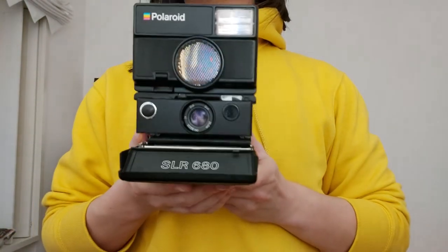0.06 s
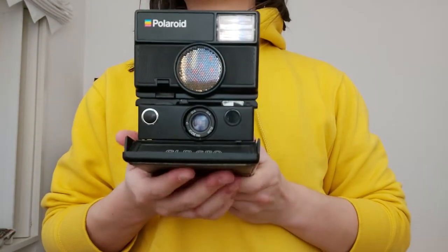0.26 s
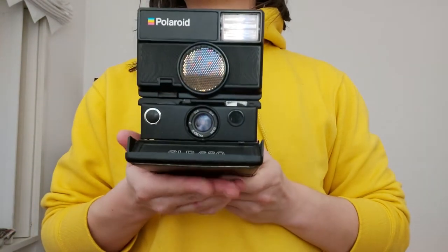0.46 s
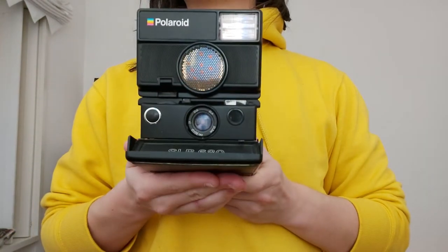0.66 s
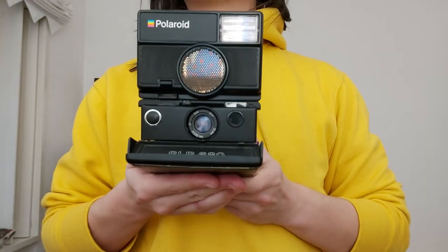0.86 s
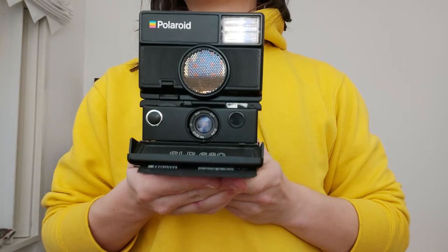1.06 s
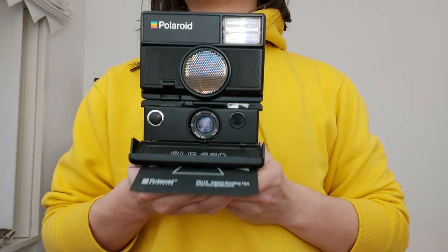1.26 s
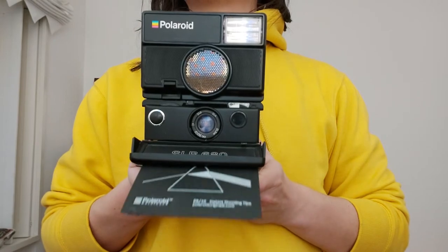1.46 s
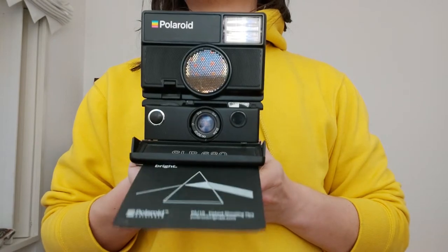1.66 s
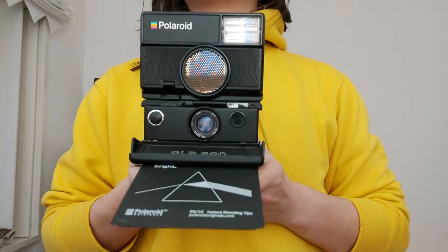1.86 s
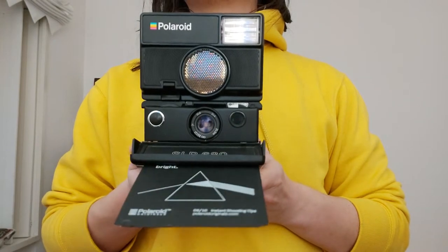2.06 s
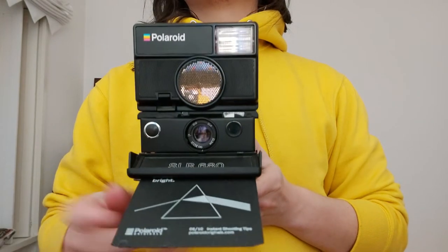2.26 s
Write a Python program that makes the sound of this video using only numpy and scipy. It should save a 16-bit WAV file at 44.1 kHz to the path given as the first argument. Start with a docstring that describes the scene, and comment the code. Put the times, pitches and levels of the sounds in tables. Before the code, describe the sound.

Close up in a quiet room, an instant camera's shutter clacks several times and its motor whines, straining as rollers squeeze out the picture. The whir rises in pitch near the end and cuts off with a sharp click.

```python
"""A shutter button slides in, then an instant camera clacks and whirrs as it ejects a picture.
Latches and the mirror strike the hollow body, and a small motor drives rattling plastic gears.
The motor labours while the rollers squeeze the sheet, runs free once it is out, and stops with a
sharp click; springs ring on. The camera is close to a stereo microphone in a small, quiet room."""
import sys
import numpy as np
from scipy import signal
from scipy.fft import rfft, irfft, next_fast_len
from scipy.io import wavfile

SR = 44100
rng = np.random.default_rng(int(sys.argv[2]) if len(sys.argv) > 2 else 0)


def digitize_waveform(pressure):
    """Quantize a signal to 16-bit integers and store it at the path in sys.argv[1].

    Rows of a 2-D input are taken as channels; values are limited to [-1, 1].
    """
    field = np.atleast_2d(pressure).T
    bounded = np.clip(field, -1, 1)
    quanta = np.round(bounded * 32767).astype(np.int16)
    wavfile.write(sys.argv[1], SR, quanta)


N = 101429
TIME = np.arange(N) / SR


def amp(db):
    """Turns decibels into a number to multiply by."""
    return 10 ** (np.asarray(db) / 20)


def unit(x):
    """Scales a sound to an average (rms) size of 1."""
    return x / np.sqrt(np.mean(x ** 2) + 1e-20)


def curve(rows, column=1):
    """Joins the points of a time table with straight lines."""
    rows = np.array(rows)
    return np.interp(TIME, rows[:, 0], rows[:, column])


def look_up(points, hz):
    """Reads between the rows of a frequency table, with octaves evenly spaced."""
    f, value = np.transpose(points)
    return np.interp(np.log(hz + 1), np.log(f + 1), value)


def colour(x, points, lag_s=0):
    """Turns each frequency up or down by a table, with no ringing ahead of the sound."""
    size = 2 * next_fast_len(N)
    hz = np.fft.fftfreq(size, 1 / SR)
    log_gain = np.log(amp(look_up(points, abs(hz))))
    response = np.exp(np.conj(signal.hilbert(log_gain)) - 2j * np.pi * hz * lag_s)
    return irfft(rfft(x, size) * response[:size // 2 + 1], size)[..., :N]


def drift(rate_hz):
    """A random wander of size 1, mostly slower than the given rate."""
    hz = np.fft.rfftfreq(N, 1 / SR)
    return unit(irfft(rfft(rng.standard_normal(N)) / (1 + (hz / rate_hz) ** 2), N))


def add(mix, start_s, sound):
    """Mixes a sound into both channels at a given time."""
    part = mix[:, round(start_s * SR):][:, :sound.shape[-1]]
    part += sound[..., :part.shape[1]]


# how much of a sound differs between left and right: f/Hz, share/dB
STEREO_SPREAD = [(40, -5), (150, -8), (350, -25.5), (700, -3), (1500, -1.5), (3000, -4), (16000, -4)]

def stereo(a, b):
    """Makes two channels that share sound a and differ by sound b."""
    n = len(a)
    share = np.clip(amp(look_up(STEREO_SPREAD, np.fft.rfftfreq(n, 1 / SR))), 0, 1)
    same = irfft(rfft(a) * np.sqrt(1 - share ** 2), n)
    apart = irfft(rfft(b) * share, n)
    return np.array([same + apart, same - apart])


def hiss(n=N):
    """Noise that is partly alike on the left and right."""
    return stereo(*rng.standard_normal((2, n)))


def rubbing(scrape, levels, band_hz):
    """Friction: one band of a scraping noise swells and fades by a table."""
    band = signal.butter(3, band_hz, "band", fs=SR, output="sos")
    sounding = (TIME > levels[0][0]) & (TIME < levels[-1][0])
    return sounding * amp(curve(levels)) * unit(signal.sosfilt(band, scrape))


# the tone of the quiet room: f/Hz, relative level/dB
ROOM_TONE = [(20, -19), (50, 0.5), (90, -9), (200, -10.5), (500, -11.5), (900, -15), (2000, -19.5),
             (4200, -27), (5200, -29), (8000, -35.5), (11000, -26), (16000, -24.5)]

def room_tone(level_db=-75):
    """A very faint rush lies under everything."""
    return amp(level_db) * unit(colour(hiss(), ROOM_TONE))


# the button's slide: t/s, level/dB
BUTTON_SLIDE = [(.15, -100), (.19, -72), (.205, -76), (.214, -51), (.232, -47), (.25, -100)]

def shutter_button():
    """The button rubs as it slides in."""
    return rubbing(hiss(), BUTTON_SLIDE, band_hz=(600, 3000))


def blow(low_hz, high_hz, buzz_fade_s, scatter_db, scatter_fade_s, buzz_db=-2):
    """A struck part: a sharp push, a brief contact buzz, then shaking that scatters through the case."""
    t = TIME[:SR // 5]
    band = signal.butter(2 if low_hz < 1200 else 3, [low_hz, high_hz], "band", fs=SR, output="sos")
    push = signal.sosfilt(band, 1. * (t == 0))
    buzz = signal.sosfilt(band, rng.standard_normal(len(t)) * amp(-60 * t / buzz_fade_s))
    scatter = signal.sosfilt(band, hiss(len(t)) * amp(-60 * t / scatter_fade_s))
    contact = unit(unit(push) + amp(buzz_db) * unit(buzz))
    return unit(contact + amp(scatter_db) * unit(scatter)) / np.sqrt(20)  # energy of 10 ms at size 1


# the parts that ring: hollow body, mirror, shell, latch, pawl (a gear's catch), metal edge
# low f/Hz, high f/Hz, buzz fade/s, scatter level/dB, scatter fade/s (a fade is a 60 dB drop)
PARTS = [(343.5, 637, 0.014, 0.5, 0.19), (795, 1018, 0.0037, 3.5, 0.058), (1518, 2165, 0.0018, -2.5, 0.067),
         (1900, 4500, 0.018, 3, 0.088), (4960, 5646, 0.0057, -11.5, 0.036),
         (10730, 15500, 0.0052, 3, 0.052)]
# the clacks: t/s, then level/dB for each of the six parts in turn
CLACKS = [(0.188, -68, -86, -75, -61.5, -74, -72.5), (0.233, -32.5, -26, -28, -26, -41.5, -41.5),
          (0.2376, -31, -26.5, -27, -25, -55, -58.5), (0.243, -33.5, -43, -29, -55, -43, -52.5),
          (0.3789, -27.5, -32.5, -27.5, -26, -30.5, -34), (0.4712, -21, -26.5, -27.5, -34.5, -39, -43),
          (0.4804, -21.5, -31, -38, -40, -52.5, -60), (.498, -26, -49, -35, -49.5, -55.5, -65),
          (0.5572, -33.5, -37, -27, -30.5, -42, -41), (.566, -33, -43, -46, -41, -42, -52),
          (0.5721, -44, -32, -26.5, -33.5, -59, -38), (0.5834, -33, -35, -52, -34, -39, -50),
          (1.0192, -25.5, -29, -31, -31.5, -58, -59), (1.5883, -37, -44.5, -28.5, -34.5, -40.5, -58.5),
          (1.632, -35, -47, -47.5, -42, -48, -63.5), (1.67, -33.5, -38.5, -31, -40.5, -45.5, -45),
          (1.6872, -28, -31.5, -26, -29.5, -43, -52.5), (1.9697, -40.5, -35, -28.5, -25.5, -27, -27)]
# the springs' faint ring under the hardest latch blow: f/Hz, level/dB, fade/s
SPRING_SHIVER = [(1739, -50.5, 0.47), (2085, -56.5, .5), (2438, -57, 0.54), (3780, -46.5, 0.33)]

def clacks():
    """Latches and mirror strike the case; latch blows also set the springs ringing."""
    out, t = np.zeros((2, N)), TIME[:SR]
    ring = sum(amp(db - 60 * t / fade) * np.sin(2 * np.pi * hz * t) for hz, db, fade in SPRING_SHIVER)
    hardest_latch_db = max(row[4] for row in CLACKS)
    for start, *levels in CLACKS:
        add(out, start, sum(amp(db) * blow(*part) for db, part in zip(levels, PARTS)))
        add(out, start, amp(levels[3] - hardest_latch_db) * ring)
    return out


# the motor's speed, given as the pitch of its hum: t/s, f/Hz
MOTOR_PITCH = [(.23, 333), (.29, 416.5), (.365, 461.3), (.43, 446.2), (.53, 487.2), (.6, 462.4),
               (.71, 411.1), (.78, 395.3), (.86, 404.3), (.93, 420.2), (1.0, 428.6), (1.075, 399.9),
               (1.17, 416.8), (1.26, 433), (1.39, 436.4), (1.46, 430.1), (1.56, 439.1), (1.65, 445.3),
               (1.72, 510.3), (1.79, 546.4), (1.87, 553.8), (1.97, 546.3), (2.04, 548.2), (2.11, 514.5)]
HUMS_PER_TURN = 3

def shaft_turns(wobble=.005):
    """Counts the turns of the motor's slightly unsteady shaft."""
    hum_hz = curve(MOTOR_PITCH) * (1 + wobble * drift(rate_hz=30))
    return np.cumsum(hum_hz) / SR / HUMS_PER_TURN


def teeth(turns, count=12, uneven_db=.66, chance_db=2, steady_rub=.35):
    """Gear teeth scrape one after another, in an uneven pattern that returns with every turn."""
    tooth, progress = (turns * count).astype(int), turns * count % 1
    pattern_db = uneven_db * unit(rng.standard_normal(count))
    force = amp(pattern_db[tooth % count] + chance_db * rng.standard_normal(N)[tooth])
    scrape = steady_rub + np.exp(-progress / .29)  # strongest as each tooth lands
    return unit(force * scrape * hiss())


# the sheet in the rollers: t/s, load from 0 to 1
SHEET_LOAD = [(.42, 0.06), (.6, 0.94), (1.2, 0.92), (1.58, 0.96), (1.66, 0.7), (1.73, 0.2)]

def sheet_load():
    """How hard the rollers squeeze; zero once the sheet is out."""
    return curve(SHEET_LOAD) * (TIME < SHEET_LOAD[-1][0])


# gear tones: cycles per turn, then relative level/dB before the sheet, under load and running free
GEAR_TONES = [(6, -1.5, -2.5, -7.5), (7, -13, -1, -13.5), (8, -10, -10.5, 2), (9, -9.5, -0.5, 2.5),
              (11, 1, 0, -10), (12, -4, 6.5, -2.5), (13, -7, -8, -8), (14, 4, -1, -5.5), (16, -9, -2, -20)]
# how well the case gives off those tones: f/Hz, boost/dB
CASE_BOOST = [(800, -1), (930, 1.5), (1015, 1.5), (1100, -0.5), (1210, 6.5), (1300, 1.5), (1450, -2),
              (2300, -1.5)]

def gear_whine(turns, roughness=.45):
    """The gears sing a rough chord whose balance shifts with the load."""
    out, load = np.zeros((2, N)), sheet_load()
    shaft_hz = curve(MOTOR_PITCH) / HUMS_PER_TURN
    for cycles, before_db, loaded_db, free_db in GEAR_TONES:
        angle = 2 * np.pi * (cycles * turns + rng.random())
        flutter = [drift(rate_hz=17) * np.sin(angle) + drift(rate_hz=50) * np.cos(angle)
                   for _ in range(2)]
        tone = np.sin(angle) + roughness * np.array(flutter)
        idle_db = np.where(TIME < SHEET_LOAD[2][0], before_db, free_db)
        gear_db = idle_db + (loaded_db - idle_db) * load
        out += amp(gear_db + look_up(CASE_BOOST, cycles * shaft_hz)) * tone
    return unit(out)


# how loud the motor runs: t/s, hum level/dB, whine level/dB, rattle level/dB
MOTOR_LEVELS = [(.228, -100, -100, -100), (.245, -76, -46, -39.5), (.31, -54, -37, -35.5),
                (.365, -35.5, -35.5, -36), (.42, -57.5, -33.5, -36.5), (.54, -41, -33, -34.5),
                (.595, -31, -35, -36), (.65, -45.5, -44.5, -34.5), (.77, -43.5, -40.5, -40),
                (.95, -47.5, -42, -37), (1.14, -40.5, -40, -40), (1.22, -48.5, -40, -38.5),
                (1.39, -41.5, -38, -38.5), (1.45, -47.5, -40, -38.5), (1.64, -39.5, -36.5, -35.5),
                (1.73, -35, -32, -33.5), (1.87, -35.5, -34, -34), (1.95, -42, -34, -33.5),
                (2.005, -32, -34.5, -28.5), (2.045, -43, -52.5, -39), (2.11, -53, -86, -59),
                (2.21, -94, -110, -110)]
# the tone of the gear rattle: f/Hz, relative level/dB
RATTLE_TONE = [(40, -46), (110, -17.5), (200, -21.5), (330, -15), (480, 4), (700, 0), (1000, 0.5),
               (1300, 1.5), (1700, 1.5), (2300, 4.5), (3200, -4), (4300, 2.5), (5400, -8), (6500, -13.5),
               (8200, -27), (10500, -15), (13000, -9.5), (16000, -13.5)]
RUNNING = TIME > MOTOR_LEVELS[0][0]

def motor(turns, roughness=.33):
    """The motor hums while its gears whine and rattle, all following one shaft."""
    hum = unit(np.sin(2 * np.pi * HUMS_PER_TURN * turns) * (1 + roughness * drift(rate_hz=30)))
    whine = gear_whine(turns)
    rattle = unit(colour(teeth(turns), RATTLE_TONE))
    hum_gain, whine_gain, rattle_gain = (amp(curve(MOTOR_LEVELS, column)) for column in (1, 2, 3))
    return RUNNING * (hum_gain * hum + whine_gain * whine + rattle_gain * rattle)


# deep thumps: t/s, level/dB
THUMPS = [(0.233, -41), (0.4701, -31.5), (.49, -40), (1.02, -41.5)]
# the whole camera as one struck part, with the same columns as PARTS
WHOLE_CAMERA = (172, 340, 0.38, 2, 0.019)
# the room's own low notes: f/Hz, level/dB compared with the thump, fade/s
ROOM_BOOM = [(112.5, -26.5, 0.67), (165.8, -4, 0.14), (206.3, -15, 0.47), (277.3, -4, 0.32)]

def thumps(jolt_db=-22, jolt_s=.0026, boom_rise_s=.0061):
    """The whole camera jolts in the hands and makes the room boom."""
    out, t = np.zeros((2, N)), TIME[:SR]
    boom = sum(amp(db - 60 * t / fade) * np.sin(2 * np.pi * hz * t) for hz, db, fade in ROOM_BOOM)
    boom *= 1 - np.exp(-t / boom_rise_s)
    jolt = amp(jolt_db) * t / jolt_s * np.exp(1 - t / jolt_s)
    for start, db in THUMPS:
        add(out, start, amp(db) * blow(*WHOLE_CAMERA))
        add(out, start, amp(db) * (boom + jolt))
    return out


# the crisp start of the louder clacks: t/s, f/Hz, level/dB, rise/s
CLACK_ATTACKS = [(.235, 889, -25, 0.0045), (.4716, 1230, -24, 0.0034), (.5579, 990, -15.5, 0.00038),
                 (.5714, 2015, -4, 0.0004), (1.0194, 1723, -4.5, 0.00093), (1.0277, 1810, -14.5, 0.00057),
                 (1.5884, 1990, -20.5, 0.00055), (1.5887, 4140, -13, 0.0006), (1.6872, 2020, -20, .0015),
                 (1.9699, 5310, -15, 0.00062)]

def clack_attacks():
    """The crisp, pitched attack of the louder clacks: one short note that dies almost at once."""
    out, t = np.zeros((2, N)), TIME[:SR // 20]
    for start, hz, db, rise in CLACK_ATTACKS:
        swell = t / rise * np.exp(1 - t / rise)
        add(out, start, amp(db) * swell * np.sin(2 * np.pi * hz * t))
    return signal.sosfilt(signal.butter(2, 400, "high", fs=SR, output="sos"), out)


# the tone of the squeezing rollers: f/Hz, relative level/dB
ROLLER_TONE = [(300, -32), (1300, -11), (1700, 4.5), (2200, -12.5), (3000, -5.5), (4100, 1), (4500, -9.5),
               (4950, 1.5), (5400, -1.5), (6100, -13), (7500, -14), (8600, -16), (10200, -11.5),
               (12000, -15), (16000, -12.5)]

def rollers(turns, scrape_db=-36.5, squeak_db=-40, squeak_hz=5160, working_hz=421):
    """The rollers scrape, stick and slip: tiny high chirps that rise with the motor's speed."""
    hz = squeak_hz * (curve(MOTOR_PITCH) / working_hz) ** .4 + 190 * drift(rate_hz=110)
    grip = amp(4.5 * np.minimum(drift(rate_hz=110), 1))  # breaks the squeak into chirps
    squeak = unit(grip * np.sin(2 * np.pi * np.cumsum(hz) / SR))
    scrape = unit(colour(teeth(turns), ROLLER_TONE))
    return RUNNING * sheet_load() * (amp(scrape_db) * scrape + amp(squeak_db) * squeak)


# the rollers' bite: t/s, level/dB
SHEET_BITE = [(.68, -70), (.74, -32), (.8, -38), (.95, -63.5), (1.05, -76.5)]

def sheet_bite(turns):
    """The rollers rasp as they bite the thick front edge of the sheet."""
    return rubbing(teeth(turns), SHEET_BITE, band_hz=(1060, 2470))


# the motor's whistles: start t/s, end t/s, f/Hz, width/Hz, level/dB
WHISTLES = [(0.739, 1.057, 13020, 450, -48), (1.68, 2.0, 14450, 519, -52.5)]

def whistles(ramp_s=.08):
    """Thin, fuzzy whistles come and go while the motor runs."""
    out = np.zeros((2, N))
    for start, end, hz, width_hz, db in WHISTLES:
        angle = 2 * np.pi * hz * TIME
        tones = [drift(width_hz / 2) * np.sin(angle) + drift(width_hz / 2) * np.cos(angle)
                 for _ in range(2)]
        swell = np.clip(np.minimum(TIME - start, end - TIME) / ramp_s, 0, 1)
        out += amp(db) * swell * unit(stereo(*tones))
    return out


# the low rumble: t/s, level/dB
CASE_RUMBLE = [(1.001, -57), (1.2, -60), (1.55, -57.5), (1.68, -40), (1.8, -56.5), (2.031, -57),
               (2.17, -77.5), (2.25, -91)]

def case_rumble(turns):
    """The case rumbles with the gears, most of all as the sheet comes out."""
    return rubbing(teeth(turns), CASE_RUMBLE, band_hz=(290.5, 386.5))


# springs ringing as the camera comes to rest: t/s, f/Hz, level/dB, rise/s, fade/s
SPRINGS = [(2.03, 1739, -33, 0.02473, 0.36), (2.03, 3910, -57.5, .01, 0.34),
           (2.16, 2085, -50.5, 0.026, 0.34), (2.17, 2438, -57, 0.019, 0.336)]

def springs():
    """Small springs keep singing after the motor has stopped."""
    out, t = np.zeros((2, N)), TIME[:SR]
    for start, hz, db, rise, fade in SPRINGS:
        swell = amp(db - 60 * t / fade) * (1 - np.exp(-t / rise))
        add(out, start, swell * np.sin(2 * np.pi * hz * t))
    return out


# how long the room rings: f/Hz, fade/s
ROOM_FADE = [(120, 0.238), (500, 0.33), (1500, 0.29), (4000, 0.36), (10000, 0.25), (16000, 0.21)]

def room(x, tail_db=-10.5, early_db=-13, early_s=.014):
    """Adds quick echoes from nearby and a short, blurred tail, different at each ear."""
    t = TIME[:SR // 2]
    hz, frame_s, spectrum = signal.stft(hiss(len(t)), SR, nperseg=256)
    spectrum *= amp(-60 * frame_s / look_up(ROOM_FADE, hz)[:, None])
    tail = signal.istft(spectrum, SR, nperseg=256)[1][:, :len(t)] * (t > .006)
    early = rng.standard_normal((2, len(t))) * np.exp(-t / early_s) * (t > .001)
    early = signal.sosfilt(signal.butter(2, 800, "high", fs=SR, output="sos"), early)
    echoes = (amp(tail_db) * unit(tail) + amp(early_db) * unit(early)) / np.sqrt(len(t))
    return x + signal.fftconvolve(x, echoes, axes=1)[:, :N]


# the right side compared with the left: f/Hz, level/dB
RIGHT_SIDE = [(100, 3), (350, -0.5), (600, 0), (1200, -1), (1800, -5), (2600, -7), (3800, -9.5),
              (5300, -16), (6500, -13.5), (8000, 1), (9500, 2), (12000, 1.5), (16000, -4.5)]

def scene():
    """The camera sits a little to the left; the right side hears it later and duller."""
    turns = shaft_turns()
    camera = shutter_button() + clacks() + motor(turns) + rollers(turns) + thumps() + clack_attacks()
    camera += sheet_bite(turns) + whistles() + case_rumble(turns)
    left, right = room(camera) + springs()
    return np.array([left, colour(right, RIGHT_SIDE, lag_s=.00012)]) + room_tone()


def record(dry):
    """Cuts away the very highest treble."""
    low_pass = signal.firwin(511, cutoff=15900, window=("kaiser", 9), fs=SR)
    return signal.oaconvolve(dry, low_pass[None], "same")


dry = scene()
out = record(dry)
digitize_waveform(out)
```